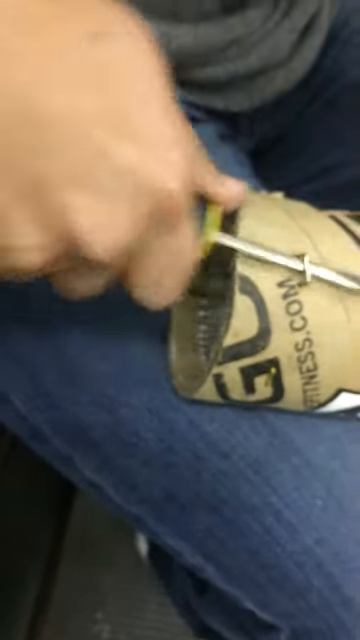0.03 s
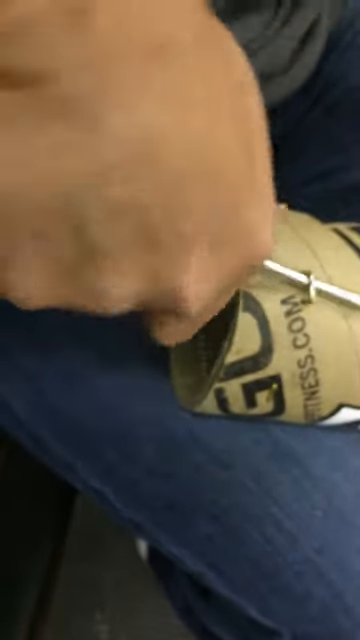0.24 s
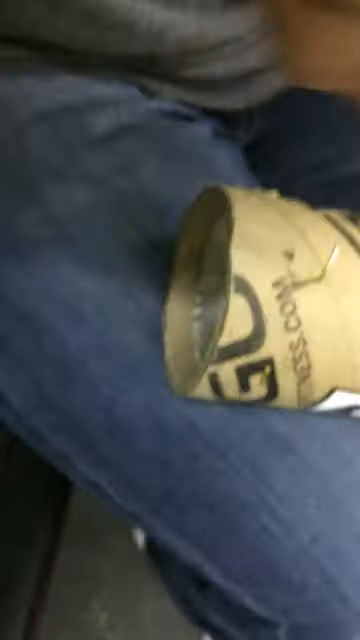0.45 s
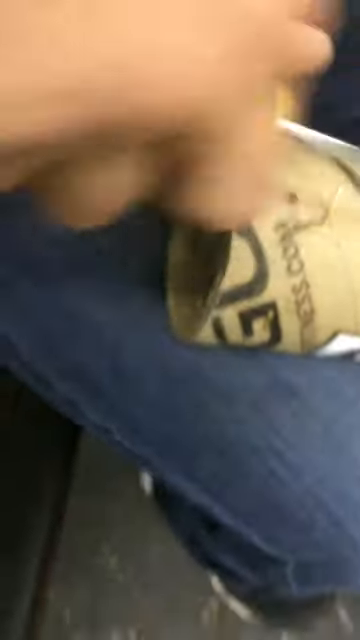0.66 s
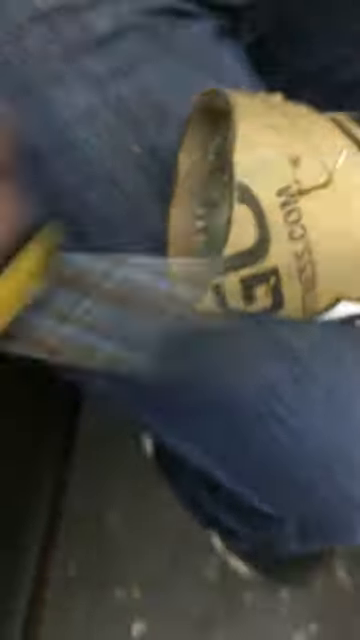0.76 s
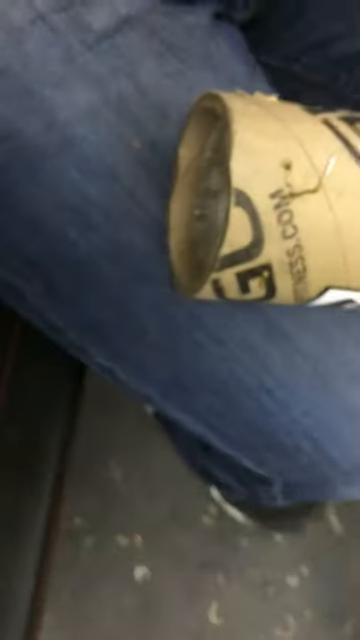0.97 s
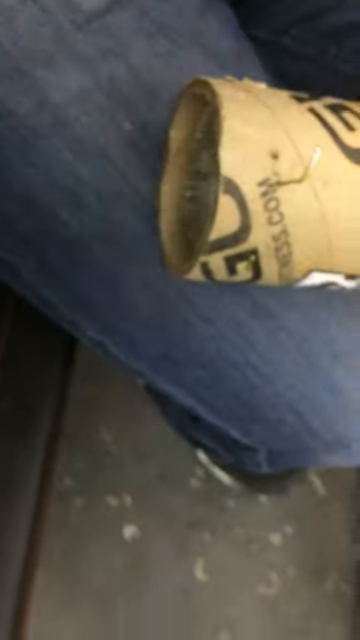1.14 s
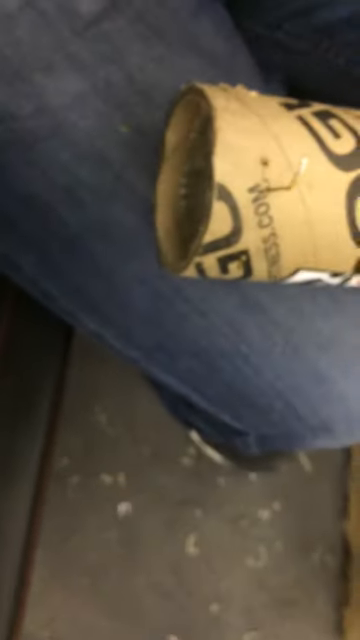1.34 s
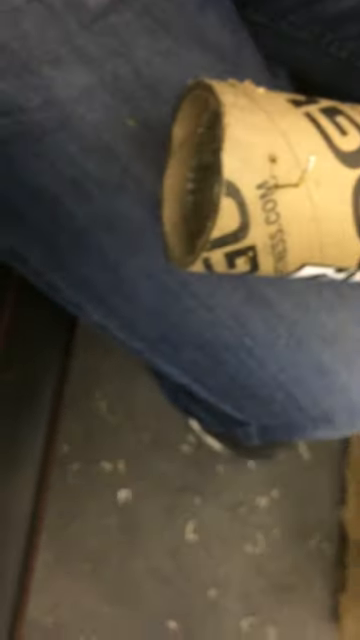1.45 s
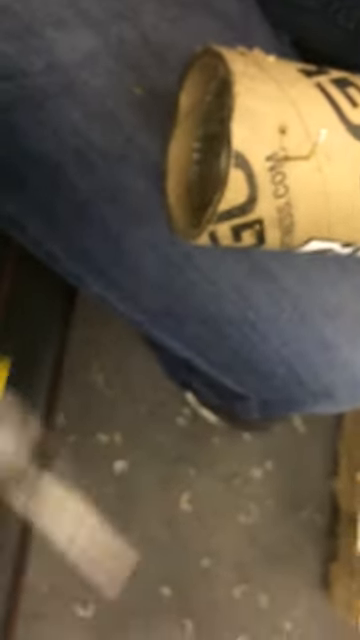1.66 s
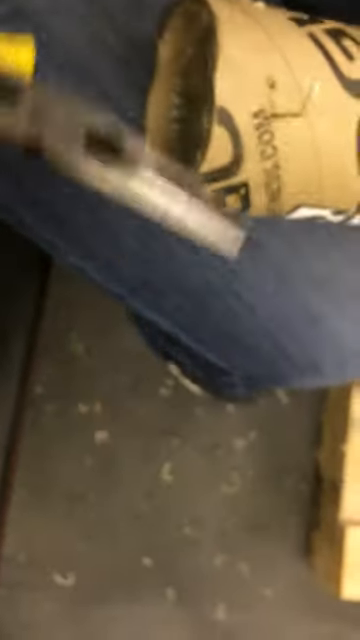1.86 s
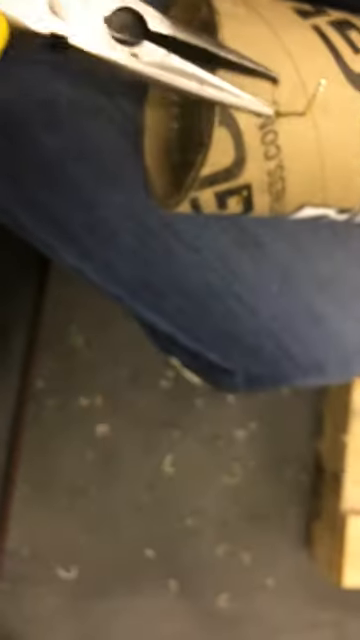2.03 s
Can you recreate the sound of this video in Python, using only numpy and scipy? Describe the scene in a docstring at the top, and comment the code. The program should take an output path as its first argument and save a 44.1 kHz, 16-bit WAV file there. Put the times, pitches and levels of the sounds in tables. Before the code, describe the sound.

A screwdriver pries at a staple in a cardboard tube: a brief twang, then a loud, hollow clatter as it tears free. Softer knocks and metal tool clicks follow, heard close in a ringing workshop with ventilation rumble.

```python
"""In a workshop, a screwdriver levers a staple out of a cardboard tube that rests on a lap.
A creak dies away; the staple slips with a twang and a ping, then tears free, and the blade clatters
against the hollow tube, setting the room ringing. The tube takes a few soft knocks while the handle
clacks and metal tools click. Cloth rustles, tools slide, and ventilation rumbles behind it all."""
import sys
import numpy as np
from scipy import signal
from scipy.fft import rfft, irfft, next_fast_len
from scipy.io import wavfile

SR = 44100
rng = np.random.default_rng(int(sys.argv[2]) if len(sys.argv) > 2 else 0)


def digitize_waveform(pressure):
    """Quantize a signal to 16-bit integers and store it at the path in sys.argv[1].

    Rows of a 2-D input are taken as channels; values are limited to [-1, 1].
    """
    field = np.atleast_2d(pressure).T
    bounded = np.clip(field, -1, 1)
    quanta = np.round(bounded * 32767).astype(np.int16)
    wavfile.write(sys.argv[1], SR, quanta)


N = 92610
T = np.arange(N) / SR
CUTOFF_HZ = 16381


# Blows on the tube. Each row: start in seconds, levels in dB of the air thump, wall, rim,
# crack and tick, contact length in seconds.
TUBE_BLOWS = [(0.3807, 20.5, 14, 20, 7.5, 11, 0.00097), (0.3847, 22.5, -3, -20, -6, -5, 0.0051),
              (0.3908, 21, 21, 17.5, 14, 0.5, 0.0014), (0.4035, 15, 14.5, 4.5, 0, -14, .004),
              (.4093, 6, 4, 18.5, 13.5, -26, 0.00069), (.4112, 20, 15.5, 24.5, 4, -19, 0.0019),
              (.4200, 14.5, -9, 12, 1, -23, 0.0023), (0.4271, -8, 16.5, 22, 14, -8, 0.0021),
              (0.4328, 0, -7, 5, 11, -5, 0.005), (0.4446, 8, 5, 11.5, -4, -6, 0.0023),
              (1.1292, 17, 3, -9.5, -17, -41, 0.00071), (1.145, -13, -27, -33, -52, -51, .001),
              (1.1809, 18.5, 6, -2, -11, -12.5, 0.00074), (1.2630, 7, -4.5, -12.5, -8, -23, 0.00069),
              (1.3, -1, -32, -36, -31, -34, 0.00079), (1.306, -13, -8, -13, -9, -26.5, 0.0031),
              (1.311, 17.5, 5.5, -19, -16, -19.5, 0.0011), (1.3293, 17, -17, -4, -4.5, -44, 0.00075),
              (1.336, 15, -2.5, -21, -15, -39, 0.00082), (1.3387, -12, -15, -7.5, -18, -34, 0.0014),
              (1.3443, -18, -17, -20, -29, -30, 0.0013), (1.362, -5, -26, -15, -21, -33, 0.0011),
              (1.391, 5, -6, -22, -34, -26, 0.0015), (1.425, 11.5, -27, -26, -9, -9.5, 0.0029),
              (1.449, 5, -17, -22, -26, -22, .002), (1.6095, -7.5, -32, -22.5, -20.5, -34, 0.0015)]
# The tube's hollow ring. Each row: pitch in Hz, level in dB, ring time to -60 dB in seconds.
TUBE_MODES = [(75, -3.5, 0.12), (165.4, 0.5, .06), (225.7, -6.5, 0.039), (371, -3, 0.02),
              (499, -2.5, 0.031), (602.6, 0, 0.016), (740, 2, 0.016), (927, 0, 0.018), (1170, 1.5, 0.034),
              (1402, 2, .016), (1714, 1.5, .016), (2001, -3.5, 0.014), (2580, -6.5, .012),
              (3177, -8, 0.036)]
# The bite of the fibres and the bright edge of the steel. Each row: frequency in Hz, gain in dB.
CRACK_EQ = [(600, -28), (1500, -7), (2400, -3.5), (3100, -3), (4000, -6.5), (5500, -9.5), (8000, -16),
            (15000, -31.5)]
TICK_EQ = [(2000, -15), (4500, -9), (6500, -13), (8000, 0.5), (10500, -2), (13000, -4.5), (14800, -5),
           (15800, -18)]

def cardboard_tube():
    """Blows ring the air column, wall and rim, each with a crack of fibres and a tick of steel."""
    starts, thump, wall, rim, crack, tick, lengths = np.transpose(TUBE_BLOWS)
    wall_from_hz, rim_from_hz = 350, 1060
    body = struck(starts, TUBE_MODES,
                  lambda hz: thump if hz < wall_from_hz else wall if hz < rim_from_hz else rim)
    fibres = coloured(bursts(starts, crack, lengths), CRACK_EQ)
    steel = coloured(bursts(starts, tick, lengths), TICK_EQ)
    return body + fibres + steel


# The staple slips on the blade. Each row: start in seconds, twang level in dB, ping level in dB.
STAPLE_SLIPS = [(.1478, 22.5, 5), (0.1619, 7.5, -12.5), (0.1738, 11.5, -15.5), (0.1849, -2, -15),
                (0.186, -1, -17.5)]
# The woody twang and the thin wire ping. Each row: pitch in Hz, level in dB, ring time in seconds.
TWANG_MODES = [(453, -10.5, 0.021), (633, -13.5, .012), (1042, 2.5, 0.025), (1380, -11.5, 0.011),
               (2100, -11.5, 0.03)]
PING_MODES = [(3500, -6, 0.0079), (4250, -3, .005), (5696, 0, 0.03), (7680, 2.5, 0.015),
              (10870, 3.5, 0.015), (12450, -4.5, 0.02)]
# The rasp of torn fibres. Each row: frequency in Hz, gain in dB.
GRIT_EQ = [(300, -9.5), (1500, 8), (3000, -0.5), (6000, -2.5), (15000, -17)]

def staple():
    """Each slip twangs the cardboard around the staple, tears fibres and pings the wire."""
    starts, twang_db, ping_db = np.transpose(STAPLE_SLIPS)
    grit = coloured(bursts(starts, ping_db - 6, length_s=0.0036), GRIT_EQ)
    twang = struck(starts, TWANG_MODES, lambda hz: twang_db)
    ping = struck(starts, PING_MODES, lambda hz: ping_db)
    return twang + ping + grit


# The blade springs free; later the handle is tapped. Each row: start in seconds, level in dB.
BLADE_SPRINGS = [(0.3808, 23.5), (0.3925, 12.5)]
HANDLE_TAPS = [(1.1815, 3), (1.2630, -9)]
# Tight steel and hard plastic. Each row: pitch in Hz, level in dB, ring time in seconds.
SHAFT_MODES = [(2950, 1, 0.01), (3433, -6, 0.0025)]
HANDLE_MODES = [(1390, -1.5, 0.0085), (2380, 0.5, 0.0078), (5940, -4.5, 0.0043)]

def screwdriver():
    """The steel shaft rings briefly, damped by the hand; the handle gives a dry clack."""
    spring_starts, spring_db = np.transpose(BLADE_SPRINGS)
    tap_starts, tap_db = np.transpose(HANDLE_TAPS)
    shaft = struck(spring_starts, SHAFT_MODES, lambda hz: spring_db)
    handle = struck(tap_starts, HANDLE_MODES, lambda hz: tap_db)
    return shaft + handle


# Metal touches metal. Each row: start in seconds, level in dB.
TOOL_CLINKS = [(1.4239, -1.5), (1.4239, -16.5), (1.4286, -7), (1.4316, -14)]
# The glint of each touch. Each row: frequency in Hz, gain in dB.
CLINK_EQ = [(300, -26), (1100, -4), (2000, -20), (3900, -9), (4500, 3.5), (5600, 1), (6700, -1),
            (7600, -14), (11000, -22), (13200, -13), (15500, -13.5)]

def metal_tools():
    """Tools click together in a short, bright chatter."""
    starts, levels_db = np.transpose(TOOL_CLINKS)
    return coloured(bursts(starts, levels_db, length_s=0.0018), CLINK_EQ)


# The creak's tail. Each row: pitch in Hz, width in Hz, opening gain in dB, fade in dB per second.
CREAK_BANDS = [(490, 87, -21.5, 105), (1378, 63, -18, 46.5), (1510, 260, -21.5, 56.5),
               (1850, 200, -28.5, 68), (2930, 200, -30, 76), (3150, 180, -32.5, 76)]

def creak_tail():
    """A creak of the levered staple dies away in the room as narrow bands of noise."""
    tail = np.zeros(N)
    for hz, width, db, fall in CREAK_BANDS:
        band = resonance(rng.standard_normal(N), hz, 2 * width)
        tail += from_db(db - fall * T) * resonance(band, hz, 2 * width)  # a second pass narrows it
    return tail


# The colour of the close reflections. Each row: frequency in Hz, gain in dB.
SCATTER_EQ = [(100, -15), (300, -7.5), (600, 2), (3000, -6), (6000, -11.5), (15000, -11)]
# The workshop's reverb. Each row: frequency in Hz, level in dB, decay time to -60 dB in seconds.
ROOM_DECAY = [(100, -25.5, 0.58), (230, -21, 0.77), (366, -7.5, 1.7), (610, -9, 1.1), (850, -10.5, 1.67),
              (1400, -11, 1.45), (2136, -11, 1.18), (3200, -17, 1.42), (4860, -16, 0.61), (6560, -26, .5),
              (9000, -24.5, .42), (15000, -33.5, .33)]

def workshop_reverb(x):
    """Floor, legs and bench scatter the sound; a diffuse tail follows, dying faster in the treble."""
    scatter_db, scatter_t60_s, predelay_s, build_s = -5, 0.04, 0.002, 0.022
    scatter = rng.standard_normal(N) * from_db(-60 * T / scatter_t60_s) * (T > predelay_s)
    response = from_db(scatter_db) * coloured(scatter / np.linalg.norm(scatter), SCATTER_EQ)
    edges_hz = np.geomspace(60, 17000, 17)
    white = rng.standard_normal((2, N))  # neighbouring bands take different noise
    for k, (low, high) in enumerate(zip(edges_hz, edges_hz[1:])):
        hz = np.sqrt(low * high)
        fade = from_db(-60 * T / at_hz(ROOM_DECAY, hz, column=2)) * (1 - np.exp(-T / build_s))
        band = signal.sosfilt(signal.butter(2, [low, high], "band", fs=SR, output="sos"), white[k % 2])
        response += from_db(at_hz(ROOM_DECAY, hz)) * band * fade / np.linalg.norm(fade)
    return signal.fftconvolve(x, response)[:N]


# The fader ride on the rustle. Each row: time in seconds, level in dB.
RUSTLE_FADER = [(0, -45.5), (.14, -52), (.3, -54.5), (.7, -57.5), (1.1, -74.5), (1.36, -60), (1.41, -51.5),
                (1.46, -48.5), (1.53, -58.5), (1.65, -57), (1.85, -68), (2.1, -77)]
# Sliding tools. Each row: peak time in seconds, spread in seconds, level in dB.
SLIDE_SWELLS = [(1.422, 0.012, -31), (1.468, 0.0082, -39.5), (1.679, 0.046, -50.5), (2.056, 0.072, -48)]
# Airy cloth and a dull scrape. Each row: frequency in Hz, gain in dB.
RUSTLE_EQ = [(200, 0), (700, 3), (1500, -4.5), (3000, 2), (6000, -3.5), (10000, -8.5), (15000, -11.5)]
SLIDE_EQ = [(200, -10), (500, -5), (900, 0.5), (1300, 2), (2000, -6), (3200, -14), (8000, -29),
            (15000, -34)]

def handling():
    """Sleeve and hand rustle, and tools slide on the bench in soft swells."""
    swells = sum(from_db(db) * np.exp(-.5 * ((T - peak) / spread) ** 2)
                 for peak, spread, db in SLIDE_SWELLS)
    return fader(RUSTLE_FADER) * noise(RUSTLE_EQ) + swells * noise(SLIDE_EQ)


# The bass-heavy room tone. Each row: frequency in Hz, gain in dB.
VENTILATION_EQ = [(25, -45.5), (45, -38), (75, -30), (110, -33), (170, -30.5), (250, -36.5), (400, -49),
                  (700, -55.5), (1500, -51.5), (3000, -64), (6000, -68), (15000, -76)]

def ventilation():
    """Ventilation rumbles steadily, with a faint hiss on top."""
    return noise(VENTILATION_EQ)


# The fader ride on the hiss. Each row: time in seconds, level in dB.
HISS_FADER = [(0, -65), (.6, -63), (1.1, -61.5), (1.4, -75), (2.1, -92)]
# Its thin sheen. Each row: frequency in Hz, gain in dB.
HISS_EQ = [(4000, -23.5), (8000, -6.5), (10200, 3.5), (12000, -10.5), (15000, -8.5)]

def high_hiss():
    """A thin, high hiss hangs for about a second, then fades."""
    return fader(HISS_FADER) * noise(HISS_EQ)


def struck(starts, modes, force_db):
    """Soft blows ring every mode; force_db(hz) gives the blows' strengths at a mode's pitch."""
    scatter_db = 3
    reach = 1.6  # a mode feels the blow only up to this multiple of its frequency
    ring = np.zeros(N)
    for k, (hz, db, t60) in enumerate(modes):
        strengths_db = db + force_db(hz) + scatter_db * rng.standard_normal(len(starts))
        clicks = np.zeros(N)
        clicks[(starts * SR).astype(int)] = from_db(strengths_db)
        soften = signal.butter(2, min(reach * hz, CUTOFF_HZ), fs=SR, output="sos")
        push = signal.sosfilt(soften, clicks + 1e-18)
        ring += (-1) ** k * resonance(push, hz, width_hz=np.log(1000) / np.pi / t60)
    return ring


def bursts(starts, levels_db, length_s):
    """Each contact is a quickly dying spray of tiny impacts with the energy of one click."""
    spray, grit = np.zeros(N), rng.standard_normal(N)
    for start, db, length in zip(starts, levels_db, np.broadcast_to(length_s, len(starts))):
        first = int(start * SR)
        burst = grit[first:] * np.exp(-np.minimum(T[:N - first] / length / 2, 10) ** 2)
        spray[first:] += from_db(db) * burst / np.linalg.norm(burst)
    return spray


def resonance(x, hz, width_hz):
    """A two-pole resonance with unity gain at its peak."""
    radius = np.exp(-np.pi * width_hz / SR)
    feedforward = np.array([1, 0, -1]) * (1 - radius ** 2) / 2
    feedback = [1, -2 * radius * np.cos(2 * np.pi * hz / SR), radius ** 2]
    return signal.lfilter(feedforward, feedback, x + 1e-18)


def coloured(x, eq):
    """A minimum-phase EQ through (Hz, dB) points, so nothing rings ahead of an attack."""
    size = 2 * next_fast_len(N)
    gain = from_db(at_hz(eq, np.fft.rfftfreq(size, 1 / SR)))
    cepstrum = irfft(np.log(gain))
    cepstrum[1:size // 2] *= 2
    cepstrum[size // 2 + 1:] = 0
    return irfft(rfft(x, size) * np.exp(rfft(cepstrum)))[:N]


def noise(eq):
    """Steady noise of a given colour."""
    return coloured(rng.standard_normal(N), eq)


def fader(points):
    """Gain over time from (seconds, dB) points."""
    return from_db(np.interp(T, *np.transpose(points)))


def at_hz(points, hz, column=1):
    """Read a table on a log-frequency axis."""
    table = np.array(points)
    return np.interp(np.log(np.maximum(hz, 1)), np.log(table[:, 0]), table[:, column])


def from_db(db):
    """Decibels to gain."""
    return 10 ** (np.asarray(db) / 20)


def scene():
    """The mono mix: close hits and their reverb over the background."""
    close = cardboard_tube() + staple() + screwdriver() + metal_tools()
    mix = close + workshop_reverb(close) + creak_tail() + handling() + ventilation() + high_hiss()
    return mix[None]


def record(dry):
    """Peaks clip at full scale and a steep low-pass trims the very top."""
    lowpass = signal.cheby2(14, 70, CUTOFF_HZ, fs=SR, output="sos")
    return signal.sosfilt(lowpass, np.clip(dry, -1, 1))


dry = scene()
out = record(dry)
digitize_waveform(out)
```